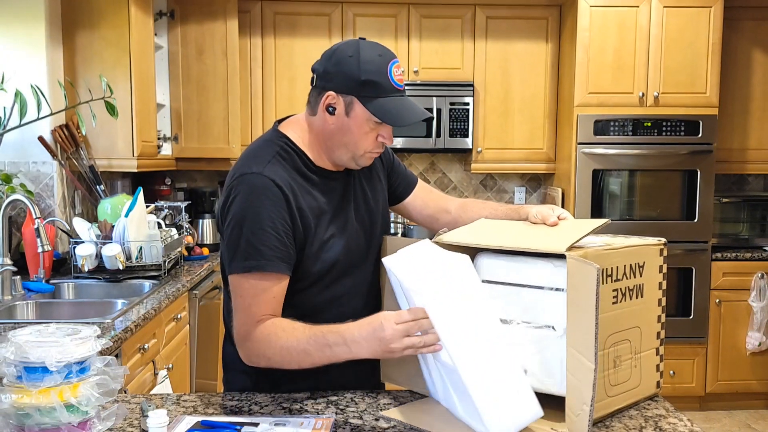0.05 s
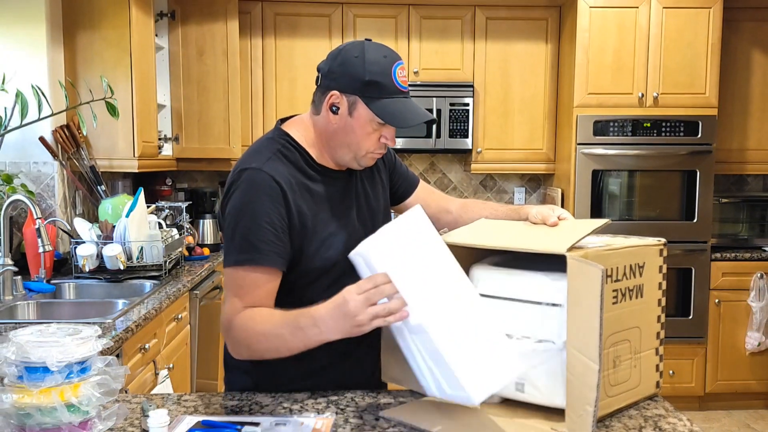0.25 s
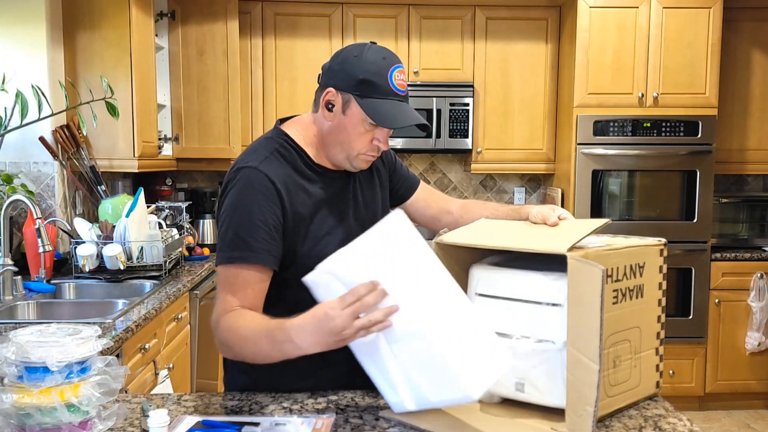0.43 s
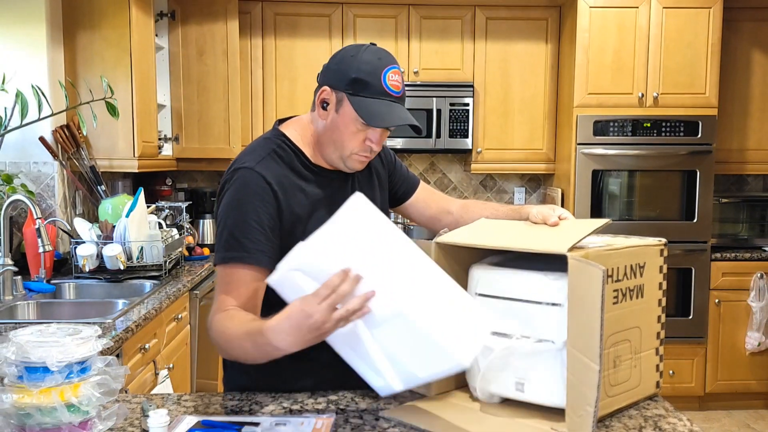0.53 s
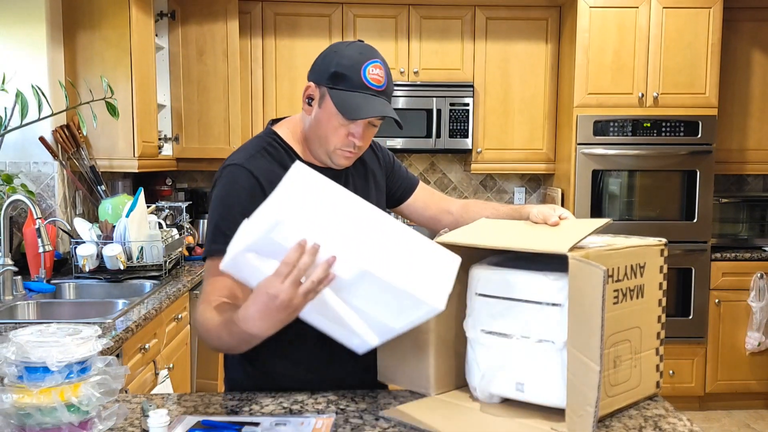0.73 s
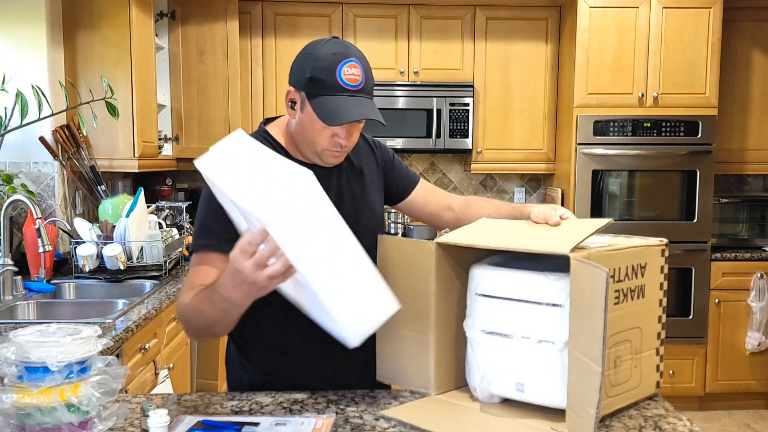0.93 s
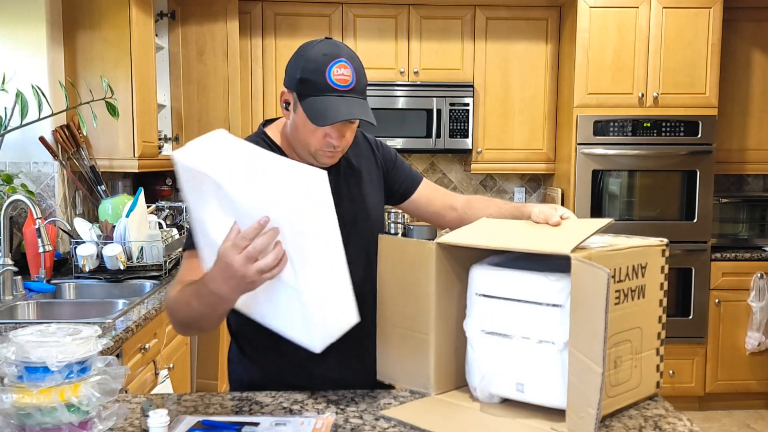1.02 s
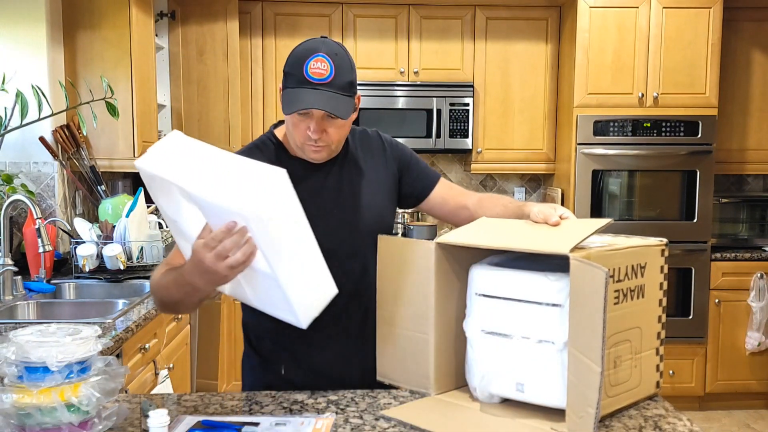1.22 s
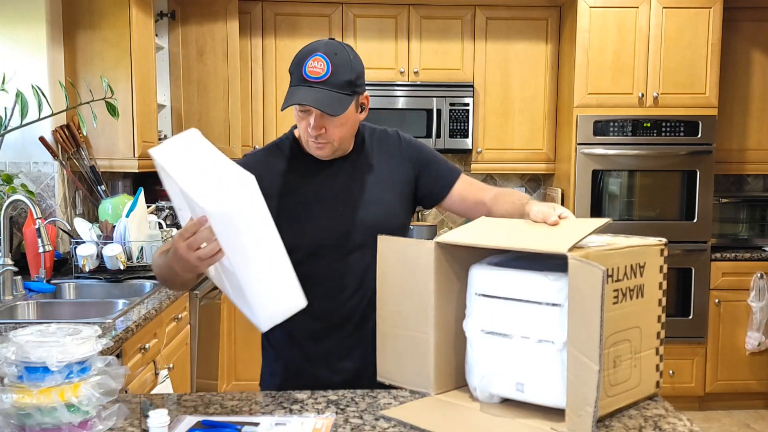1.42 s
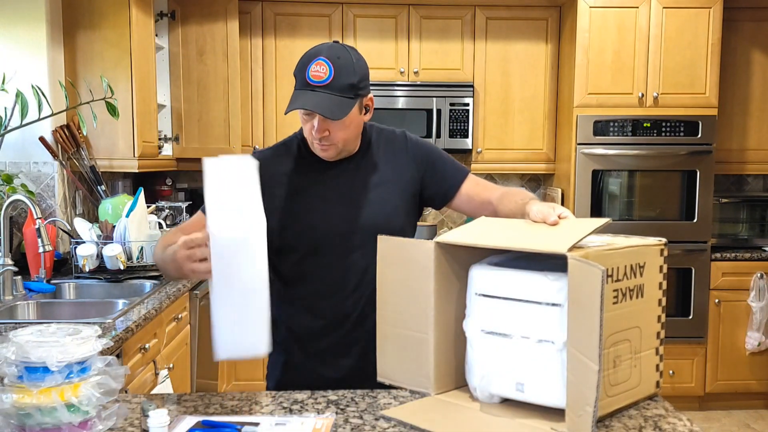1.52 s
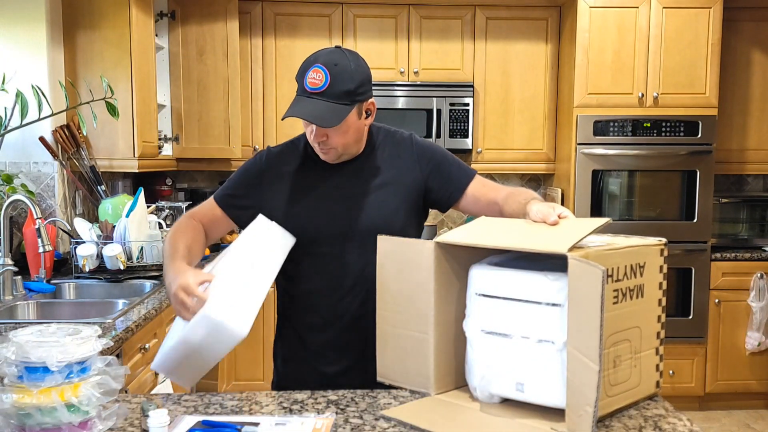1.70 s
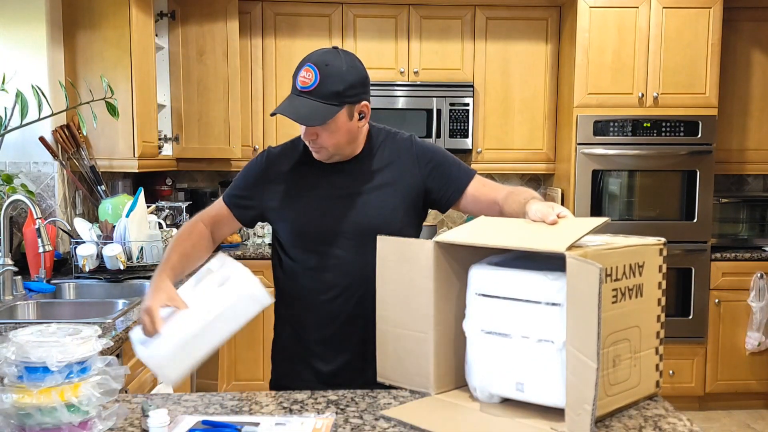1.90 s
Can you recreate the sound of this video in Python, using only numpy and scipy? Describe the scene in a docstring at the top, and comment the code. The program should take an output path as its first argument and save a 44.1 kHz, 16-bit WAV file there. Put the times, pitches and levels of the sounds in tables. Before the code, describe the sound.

A foam insert scrapes out of a cardboard box, snaps free with a hollow boom, then rubs cloth

```python
"""A foam insert scrapes along a cardboard box, snaps free and leaves the box booming in a kitchen.
Carried past the chest, close to the microphone, the foam rustles on a shirt, bumps once and rubs briefly.
Behind it all the kitchen hums faintly. Rubbing is grainy coloured noise; the box and the thump are
damped modes; the air gap between foam and chest is a noise band that slides down in pitch."""
import sys
import numpy as np
from scipy import signal
from scipy.fft import rfft, irfft, next_fast_len
from scipy.io import wavfile
from scipy.ndimage import uniform_filter1d

SR = 44100
rng = np.random.default_rng(int(sys.argv[2]) if len(sys.argv) > 2 else 0)


def dump_mix(stems):
    """Bounce the given channels to the path in sys.argv[1] as a 16-bit WAV at rate SR."""
    frames = np.atleast_2d(stems).T  # one column per channel
    limited = np.clip(frames, -1, 1)  # hard clip at full scale
    pcm = np.round(limited * 32767).astype(np.int16)
    wavfile.write(sys.argv[1], SR, pcm)


N = 85995
T = np.arange(N) / SR  # time [s]


def amp(db):
    """Decibels to gain."""
    return 10 ** (np.asarray(db) / 20)


def unit(x):
    """x at rms 1."""
    return x / np.sqrt(np.mean(x ** 2) + 1e-20)


def along(points, hz):
    """A curve of (frequency [Hz], value) points, read on a log frequency axis."""
    f, v = np.transpose(points)
    return np.interp(np.log(hz + 1), np.log(f + 1), v)


def curve(rows):
    """An envelope of (time [s], value) points joined by straight lines."""
    return np.interp(T, *np.transpose(rows))


def filtered(x, response):
    """x shaped by a gain that is a function of frequency."""
    size = next_fast_len(N + SR // 2)
    spectrum = rfft(x, size)
    return irfft(spectrum * response(np.fft.rfftfreq(size, 1 / SR)), size)[:N]


PATCH_DB, CATCH_DB = 2.5, 1.5  # rms spread of the shifting colour and of the small catches [dB]


def uneven(x):
    """The contact patch keeps changing: bands come and go and the level catches."""
    z = signal.stft(x, nperseg=256)[2]
    across_bands = uniform_filter1d(rng.standard_normal(z.shape), size=3, axis=0)
    patches = uniform_filter1d(across_bands, size=6, axis=1)
    catches = uniform_filter1d(rng.standard_normal(z.shape[1]), size=3)
    gain = amp(PATCH_DB * unit(patches) + CATCH_DB * unit(catches))
    return signal.istft(z * gain, nperseg=256)[1][:N]


def friction(colour, slips_per_s, grainy, tilt_db=0):
    """Tiny slips of foam beads over a smooth hiss, coloured, at rms 1."""
    slips = (rng.random(N) < slips_per_s / SR) * rng.uniform(-0.95, 1, N)
    share = np.clip(grainy, 0, 1)  # the slips' share of the power
    drive = np.sqrt(share) * unit(slips) + np.sqrt(1 - share) * rng.standard_normal(N)

    def response(hz):
        # the tilt [dB per octave] is flat below the second colour point
        octaves = np.log2(np.maximum(hz, colour[1][0]))
        return amp(along(colour, hz) + tilt_db * octaves)

    return unit(filtered(uneven(drive), response))


def swell(s, attack, t60):
    """Rises exponentially to a peak at s, then dies away by 60 dB in t60."""
    rise = np.exp(np.minimum(T - s, 0) / attack)
    fall = 1e-3 ** (np.maximum(T - s, 0) / t60)
    return rise * fall


def strokes(rows, colour, slips_per_s, grainy):
    """Short swells of friction, each with its own brightness."""
    total = np.zeros(N)
    for s, db, attack, t60, tilt in rows:
        total += amp(db) * swell(s, attack, t60) * friction(colour, slips_per_s, grainy, tilt)
    return total


def ring(s, modes, attack_s):
    """Damped modes set off by a soft blow at s."""
    t = np.maximum(T - s, 0)
    tones = sum(amp(db - 60 * t / t60) * np.sin(2 * np.pi * hz * t) for hz, db, t60 in modes)
    return (1 - np.exp(-t / attack_s)) * tones


# Colour of the room air: (frequency [Hz], relative level [dB])
AIR_COLOUR = [(15, -50), (25, -2), (139, -6.5), (164, -21), (254, -4), (339, -14), (411, -7), (751, -29.5),
              (828, -12.5), (890, -38.5), (1110, -58), (7260, -19.5), (8000, -26), (10400, -62.5),
              (17600, -120)]
# Steady tones of an appliance: (frequency [Hz], rms level [dB])
HUM_TONES = [(134, -74.5), (264, -86), (813, -87)]
AIR_DB = -70.5


def background():
    """Room air as coloured noise, and the hum of an appliance as steady sines."""
    air = unit(filtered(rng.standard_normal(N), lambda hz: amp(along(AIR_COLOUR, hz))))
    hum = sum(amp(db) * np.sqrt(2) * np.sin(2 * np.pi * (hz * T + rng.random())) for hz, db in HUM_TONES)
    return amp(AIR_DB) * air + hum


# Reverberation of the kitchen: (frequency [Hz], 60 dB decay time [s])
KITCHEN_T60 = [(60, .45), (200, 0.52), (1000, 0.42), (2500, 0.51), (5000, 0.4), (8000, 0.35)]
TAIL_CYCLE_S = .09  # one cycle through all the tails [s]


def kitchen(x, wet_db, delay_s=0.0057, count=3):
    """x with the reverberation of the kitchen, fading in turn between several random tails."""
    hz, t, z = signal.stft(rng.standard_normal((count, SR)), SR, nperseg=256)
    decay = amp(-60 * t / along(KITCHEN_T60, hz)[:, None])
    tails = signal.istft(z * decay, SR, nperseg=256)[1]
    tails *= 1 - np.exp(-(np.arange(tails.shape[1]) / SR / delay_s) ** 2)  # soft onset
    # the sound is sent to one tail after the other at constant power
    turns = T / TAIL_CYCLE_S - np.arange(count)[:, None] / count
    shares = np.maximum(np.cos(2 * np.pi * turns), 0)
    sends = x * shares / np.linalg.norm(shares, axis=0)
    wet = signal.fftconvolve(sends, tails / np.linalg.norm(tails[0]), axes=1).sum(0)[:N]
    return x + amp(wet_db) * wet


# Shirt rustling as the arm swings: (time [s], level [dB])
RUSTLE_LEVEL = [(.6, -66.5), (.86, -84.5), (.91, -65.5), (1.03, -66.5), (1.1, -58.5), (1.2, -56.5),
                (1.25, -67.5), (1.35, -66.5), (1.45, -73), (1.52, -67), (1.63, -62.5), (1.71, -66),
                (1.87, -59), (1.95, -69)]
# Colour of the rustle: (frequency [Hz], relative level [dB])
CLOTH_COLOUR = [(120, -24), (200, 1.5), (371, -11.5), (505, -7), (571, -8), (922, -6.5), (1130, -11.5),
                (4590, -11.5), (6060, -9), (8000, -18.5), (10400, -51.5), (17600, -120)]


def rustle():
    """Cloth slides on itself: mostly smooth friction under a drawn envelope."""
    return amp(curve(RUSTLE_LEVEL)) * friction(CLOTH_COLOUR, slips_per_s=1000, grainy=0.21)


# Fingers shifting on the foam:
# (time [s], level [dB], attack [s], 60 dB decay [s], tilt [dB per octave])
FINGER_TOUCHES = [(.514, -47, .004, 0.14, -2.5), (.529, -54, 0.011, 0.049, -4),
                  (.555, -58.5, 0.0041, 0.057, -5), (.594, -58.5, 0.012, 0.15, -1.5),
                  (.667, -60, 0.0053, 0.049, 2.5), (1.006, -51.5, .003, .04, 4),
                  (1.0745, -52.5, 0.00071, .035, -6), (1.114, -55, 0.004, 0.052, -3.5)]
# Colour of the touches: (frequency [Hz], relative level [dB])
FINGER_COLOUR = [(100, -15.5), (300, -6), (800, 3.5), (1300, 0.5), (3500, 2.5), (6000, 5), (8000, 2.5)]


def touches():
    """Fingers shift their hold in short, dense bursts of friction."""
    return strokes(FINGER_TOUCHES, FINGER_COLOUR, slips_per_s=3600, grainy=.5)


# Small squeaks of the foam under the fingers:
# (time [s], level [dB], attack [s], 60 dB decay [s], tilt [dB per octave])
FOAM_SQUEAKS = [(.722, -60.5, 0.0017, .06, -3), (.737, -64, .004, .06, 9), (.85, -70, .01, 0.092, -11)]
# Colour of the squeaks: (frequency [Hz], relative level [dB])
FOAM_SQUEAK_COLOUR = [(1000, -24), (4500, -22), (5500, 4), (6300, -6), (7200, -1.5), (8000, -18.5)]


def squeaks():
    """Foam squeaks under the fingers as short bursts of friction."""
    return strokes(FOAM_SQUEAKS, FOAM_SQUEAK_COLOUR, slips_per_s=1100, grainy=0.36)


# Foam rubbing on the shirt:
# (time [s], level [dB], attack [s], 60 dB decay [s], tilt [dB per octave])
SHIRT_RUBS = [(1.13, -52.5, 0.013, .2, -1), (1.16, -44.5, 0.0049, 0.14, -2), (1.205, -60, .025, 0.055, -1),
              (1.7505, -37, 0.0033, .1, 0.5), (1.768, -37, 0.011, 0.076, 1),
              (1.779, -35, 0.016, 0.11, 2.55), (1.801, -47.5, .004, 0.16, 0.5),
              (1.82, -48.5, 0.0064, 0.12, 2), (1.84, -43.5, .005, .07, 3.5), (1.85, -43.5, .004, 0.035, 3)]
# Colour of the rubs: (frequency [Hz], relative level [dB])
SHIRT_RUB_COLOUR = [(50, -14), (100, -4), (200, -5), (450, -4), (750, -1), (1050, -5), (1500, -1),
                    (1900, -9), (2400, -5), (3000, -1), (4200, -7), (5000, -5), (5800, -2.5), (6700, -5.5),
                    (7400, -12.5), (8000, -14.5)]


def rubs():
    """Foam drags over cloth in overlapping bursts of friction."""
    return strokes(SHIRT_RUBS, SHIRT_RUB_COLOUR, slips_per_s=1500, grainy=0.43)


# Low pushes of the rubbing foam: (time [s], level [dB])
FOAM_PUSHES = [(1.753, -36.5), (1.81, -45)]
# Modes of a push: (frequency [Hz], relative level [dB], 60 dB decay [s])
PUSH_MODES = [(58, -4.5, 0.14), (87, 2, 0.067)]


def pushes():
    """The rubbing foam pushes softly and sets off low damped modes."""
    return sum(amp(db) * ring(s, PUSH_MODES, attack_s=0.0052) for s, db in FOAM_PUSHES)


# The air gap rings lower as it closes: (time [s], resonance [Hz], level [dB])
GAP_GLIDE = [(1.031, 950, -89.5), (1.076, 855, -66.5), (1.104, 781, -64), (1.116, 698, -50.5),
             (1.135, 582.7, -60.5), (1.15, 449, -57), (1.166, 319.4, -53), (1.191, 278.5, -56.5),
             (1.27, 282, -65), (1.4, 278.3, -91.5)]
GAP_WIDTH_HZ = 170  # 6 dB down this far to either side of the resonance


def gap_noise():
    """Low noise whose bandwidth sets the width of the gap's resonance, at rms 1."""
    return unit(filtered(rng.standard_normal(N), lambda hz: 1 / (1 + (hz / GAP_WIDTH_HZ) ** 2)))


def air_gap():
    """Rubbing noise sings in the narrowing gap between foam and chest."""
    s, pitch, level = np.transpose(GAP_GLIDE)
    phase = 2 * np.pi * np.cumsum(np.interp(T, s, pitch)) / SR
    # two independent noises on a gliding carrier make a noise band around its pitch
    band = gap_noise() * np.cos(phase) + gap_noise() * np.sin(phase)
    return amp(np.interp(T, s, level)) * band


# Colour of the crisp contact with the chest: (frequency [Hz], relative level [dB])
CHEST_COLOUR = [(180, -5.5), (300, 2), (620, -18), (900, 1.5), (1150, -26), (1400, -6.5), (1600, -4),
                (1880, 8), (2200, -17.5), (2600, -5), (3200, -23), (3850, -9), (4550, -13), (5000, -2),
                (5450, -30), (6100, -8), (6700, -9.5), (7200, -8), (8000, -12.5)]
# Modes of the hollow thump: (frequency [Hz], relative level [dB], 60 dB decay [s], delay [s])
THUMP_MODES = [(68.4, 3, 0.11, 0.014), (119, -2.5, 0.08, .008), (193.6, -4, 0.096, .003),
               (307, 4, 0.057, 0), (400, -3.5, 0.054, 0.0018)]
BUMP_S, CONTACT_DB, THUMP_DB = 1.1625, -31.5, -28.5


def bump():
    """The foam bumps the chest: a crisp contact, then a thump whose lower modes tend to start later."""
    burst = swell(BUMP_S + .002, attack=0.0042, t60=0.035)
    contact = amp(CONTACT_DB) * burst * friction(CHEST_COLOUR, slips_per_s=2300, grainy=0.4)
    thump = sum(ring(BUMP_S + delay, [(hz, db, t60)], attack_s=0.004) for hz, db, t60, delay in THUMP_MODES)
    return contact + amp(THUMP_DB) * thump


# The flap judders softly as it sags back:
# (time [s], level [dB], attack [s], 60 dB decay [s], tilt [dB per octave])
FLAP_JUDDERS = [(.458, -46, .006, .16, 1.5), (.488, -47.5, 0.0054, .14, -0.5),
                (.518, -49.5, 0.0086, .1, -6.5)]
# Colour of the judders: (frequency [Hz], relative level [dB])
FLAP_COLOUR = [(30, -31.5), (60, -19.5), (110, -17), (150, -2.5), (200, -5), (235, -15), (300, -11.5),
               (420, -26), (2000, -50.5)]


def judders():
    """The sagging flap gives low bursts made almost wholly of separate slips."""
    return strokes(FLAP_JUDDERS, FLAP_COLOUR, slips_per_s=790, grainy=0.94)


# Knocks of the box: (time [s], level [dB], pitch ratio)
BOX_KNOCKS = [(0.2843, -16.5, 1), (0.2948, -22, .99), (.315, -34.5, .8), (.345, -36, 1.15), (.364, -38, .9)]
# Modes of the box: (frequency [Hz], relative level [dB], 60 dB decay [s])
BOX_MODES = [(48, -18.5, .3), (66.4, -8.5, 0.2), (95.8, -11, 0.095), (135, -5.5, 0.15), (154.4, -8, 0.13),
             (193.7, 2.5, 0.087), (249, -1.5, .09), (311.6, -9, .11), (420, -18.5, 0.068),
             (570, -14, 0.091)]


def box_boom():
    """The freed cardboard booms in damped modes; each knock bends it to another pitch."""
    boom = np.zeros(N)
    for s, db, pitch in BOX_KNOCKS:
        bent = [(hz * pitch, level, t60) for hz, level, t60 in BOX_MODES]
        boom += amp(db) * ring(s, bent, attack_s=0.0012)
    return boom


# The foam's edge tears past the flap:
# (time [s], level [dB], attack [s], 60 dB decay [s], tilt [dB per octave])
EDGE_SNAPS = [(.2795, -18.5, 0.0065, .04, 2), (.287, -26.5, .004, 0.05, -0.5),
              (.299, -25.5, 0.0034, 0.064, -2.5), (.308, -28.5, 0.0055, 0.06, -0.5),
              (.317, -32, 0.0036, 0.063, -2), (.347, -37.5, .004, 0.063, -8)]
# Colour of the snaps: (frequency [Hz], relative level [dB])
EDGE_COLOUR = [(150, -21), (330, -3.5), (700, -3.5), (900, -8), (1100, -5.5), (1800, -7), (2600, -10.5),
               (3400, -15), (3900, -14.5), (4600, -14.5), (5350, -6), (5800, -22), (6500, -6), (6900, -17),
               (7400, -15), (8000, -16)]


def snaps():
    """The edge tears free in a quick run of dense friction bursts."""
    return strokes(EDGE_SNAPS, EDGE_COLOUR, slips_per_s=3600, grainy=0.47)


# Pull of the foam sliding on cardboard, which drives body and hiss: (time [s], pull [dB])
SLIDE_PULL = [(0, -45), (.1, -45.5), (.158, -43.5), (.19, -38), (.222, -34), (.24, -35.5), (.262, -43),
              (.275, -34.5)]
# Colour of the cardboard's rasp: (frequency [Hz], relative level [dB])
RASP_COLOUR = [(35, -37), (60, -8.5), (216, -6), (249, -2), (343, -8.5), (439, -7.5), (489, -5.5), (762, 0),
               (1550, -5), (1920, -6.5), (2060, -13), (3050, -7.5), (4200, -14), (5460, -56), (9240, -120)]
# Colour of the foam's hiss: (frequency [Hz], relative level [dB])
HISS_COLOUR = [(60, -13), (150, -1), (330, 0.5), (550, -5), (850, 1), (1200, -11), (1700, -3.5), (2800, -6),
               (3900, -11), (4500, -4), (5300, 0.5), (6200, -1.5), (7300, -3.5), (8100, -13)]
EASY_PULL_DB = -43.5  # the pull at which body and hiss have the levels below
BODY_DB, BODY_GROWS = -47.5, 0.73  # level [dB], growth [dB per dB of pull]
HISS_DB, HISS_GROWS = -48, 1.49  # the hiss grows faster than the body
RELEASE_T60_S = .02  # the sliding stops as the edge comes free


def scrape():
    """Foam drags on cardboard; the harder the pull, the more it hisses, until the edge tears free."""
    effort_db = curve(SLIDE_PULL) - EASY_PULL_DB
    touching = amp(-60 * np.maximum(T - EDGE_SNAPS[0][0], 0) / RELEASE_T60_S)
    body = amp(BODY_DB + BODY_GROWS * effort_db) * friction(RASP_COLOUR, slips_per_s=1000, grainy=0.45)
    hiss = amp(HISS_DB + HISS_GROWS * effort_db) * friction(HISS_COLOUR, slips_per_s=1200, grainy=0.48)
    return touching * (body + hiss)


BOX_ROOM_DB, FOAM_ROOM_DB, NEAR_ROOM_DB = -13.5, -7.5, -24.5  # gain of the reverberation [dB]


def scene():
    """The box stands at arm's length; the handling is close and dry."""
    foam = kitchen(scrape() + snaps(), FOAM_ROOM_DB)
    box = kitchen(box_boom() + judders(), BOX_ROOM_DB)
    handling = touches() + squeaks() + rubs() + pushes() + rustle()
    near = kitchen(bump() + air_gap() + handling, NEAR_ROOM_DB)
    return (foam + box + near + background())[None]


# Overall tone: (frequency [Hz], gain [dB])
TONE = [(20, -29.5), (33, -17), (47, 1.5), (4000, 1.5), (4200, -3.5), (4650, -4), (4850, -0.5), (7500, 2.5),
        (7900, -10.5), (8250, -36)]
BAND_TOP_HZ, FLOOR_TOP_HZ = 8301, 15719  # sharp upper limits of the scene and of the noise floor
FLOOR_DB = -88  # level of the white noise before its upper limit


def record(dry):
    """The sound is band-limited, with a dip in the treble, over a very faint, band-limited noise floor."""
    toned = filtered(dry[0], lambda hz: amp(along(TONE, hz)) * (hz < BAND_TOP_HZ))
    with_floor = toned + amp(FLOOR_DB) * rng.standard_normal(N)
    return filtered(with_floor, lambda hz: hz < FLOOR_TOP_HZ)[None]


dry = scene()
out = record(dry)
dump_mix(out)
```